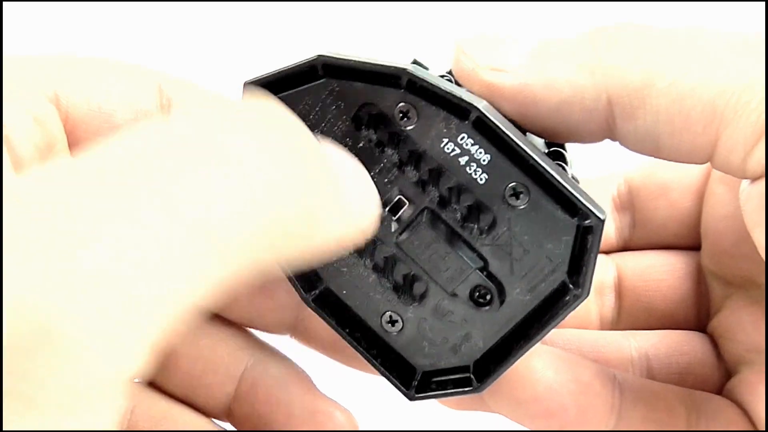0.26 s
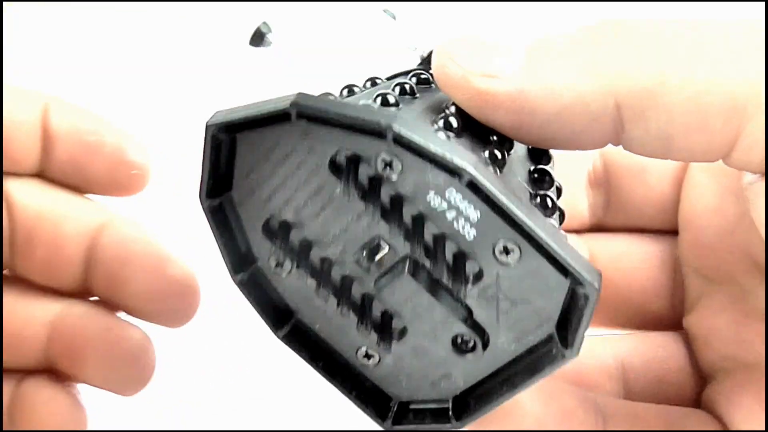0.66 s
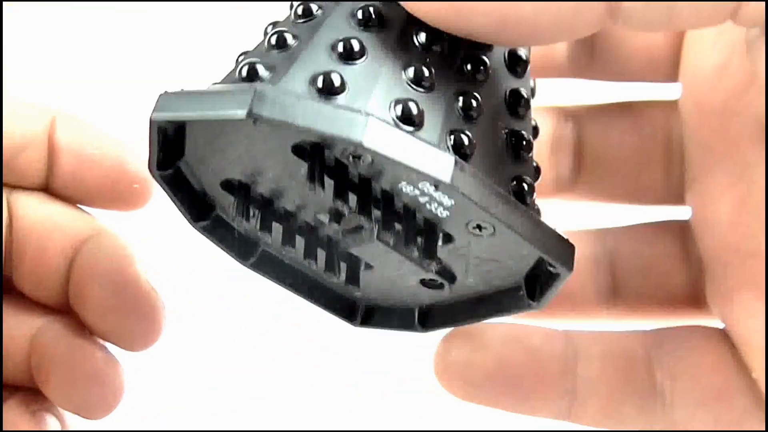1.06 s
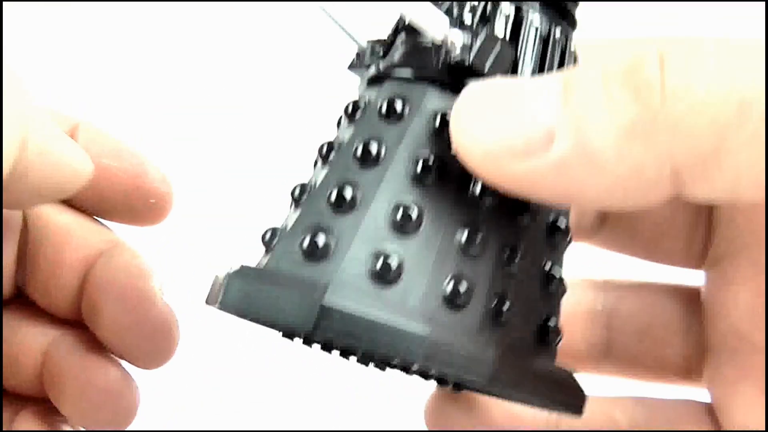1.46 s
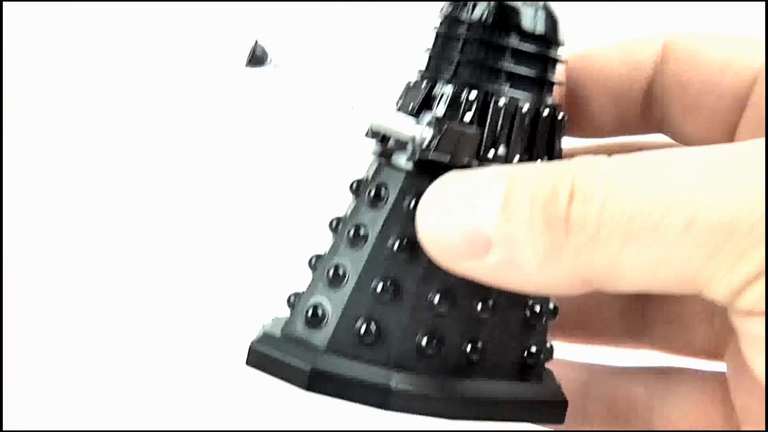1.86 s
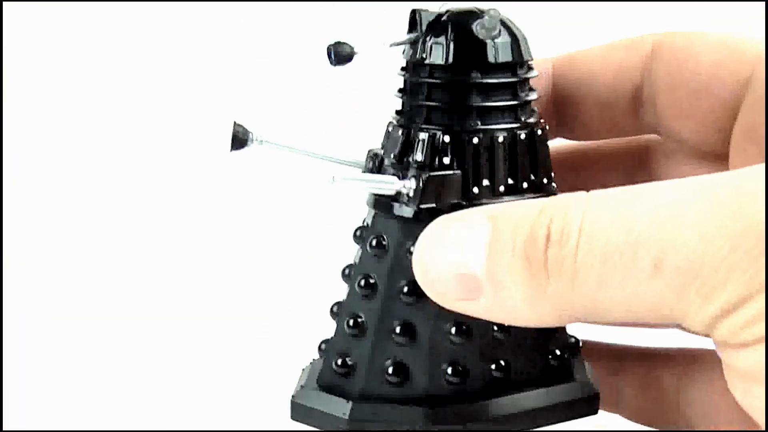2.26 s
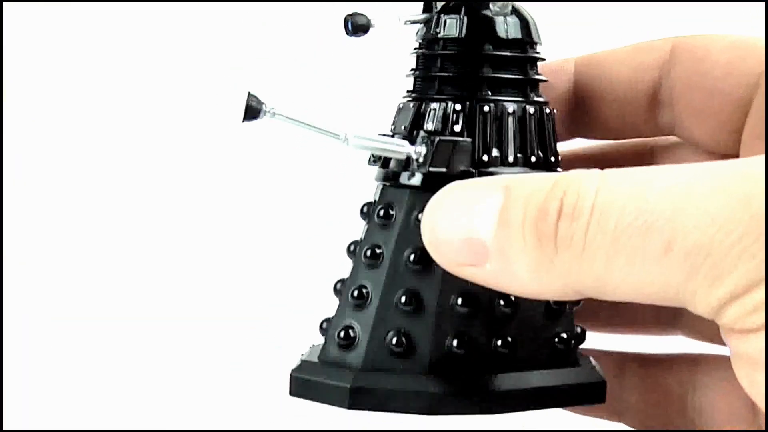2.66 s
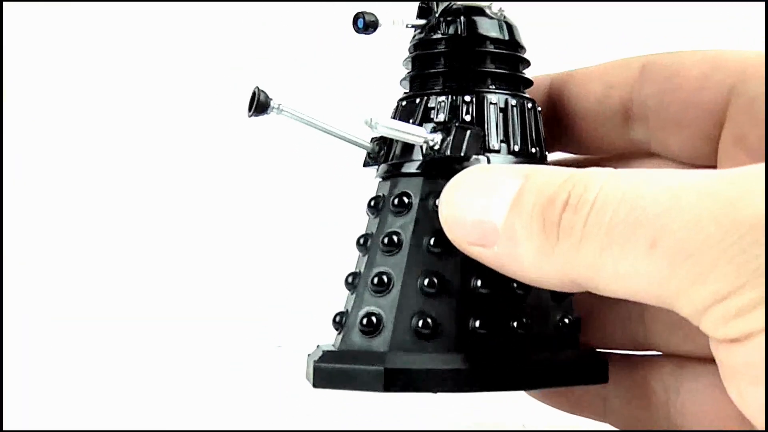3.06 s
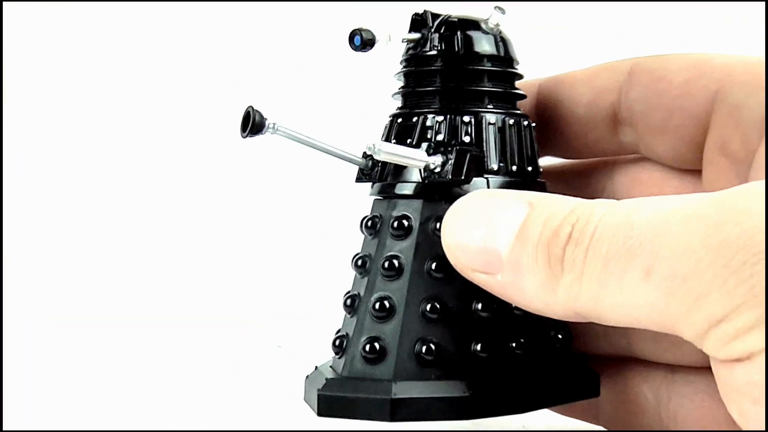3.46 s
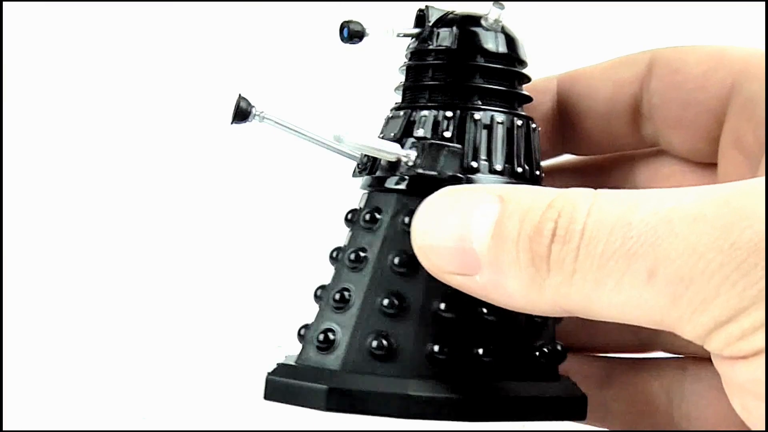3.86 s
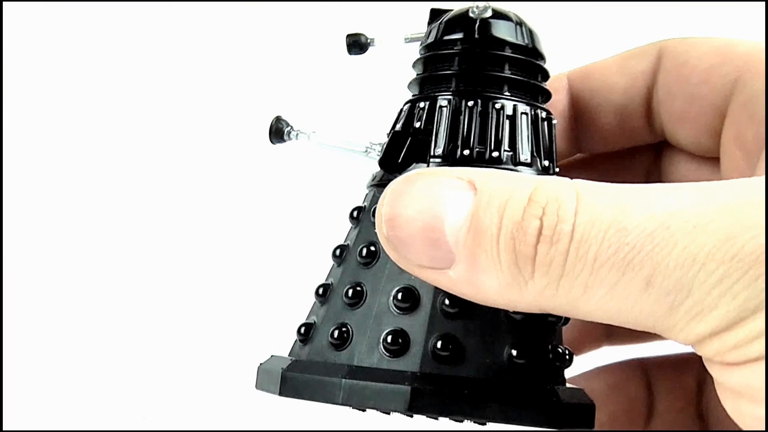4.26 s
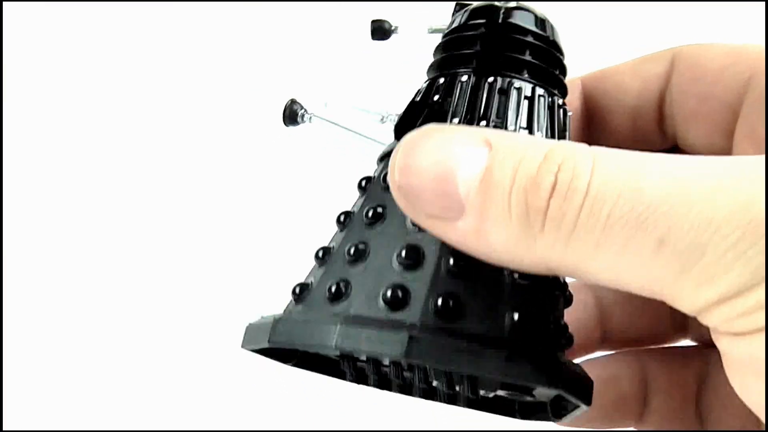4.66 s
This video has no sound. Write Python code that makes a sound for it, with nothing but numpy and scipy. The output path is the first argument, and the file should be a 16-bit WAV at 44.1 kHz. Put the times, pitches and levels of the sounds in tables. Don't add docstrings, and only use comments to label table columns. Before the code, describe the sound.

Close up in a quiet room, a small plastic toy snaps on and buzzes continuously, its shell rattling thinly as fingers shift and bump it.

```python
import sys
import numpy as np
from scipy import signal
from scipy.fft import rfft, irfft
from scipy.io import wavfile

SR = 44100
rng = np.random.default_rng(int(sys.argv[2]) if len(sys.argv) > 2 else 0)


def amplitude_ratio(level_db):
    exponent = np.asarray(level_db, float) / 20
    return 10 ** exponent


def log_audio(samples):
    frames = np.atleast_2d(samples).T
    limited = np.clip(frames, -1, 1)
    pcm = np.round(limited * 32767).astype(np.int16)
    wavfile.write(sys.argv[1], SR, pcm)


N = 212032

# frequency in Hz, density in dB per Hz.
ROOM_SPECTRUM = [(25, 8), (60, -23), (120, 4.5), (300, -5.5), (460, -1.5), (600, -7.5), (1000, -11.5),
                 (2000, -21.5), (2400, -14), (3000, -23), (8000, -26), (16000, -26.5)]
ROOM_DB = -56.5

# start in seconds, length in seconds, rub in dB, brightness in dB, weight in dB.
FINGER_SLIDES = [(0.194, 0.11, -64, -29, -9), (0.862, 0.11, -43, -10, -19), (0.946, 0.13, -46.5, 1.5, -24),
                 (1.053, .07, -43, -5, 0), (1.114, 0.17, -47.5, -6.5, -13), (1.475, 0.17, -46.5, -10, -26),
                 (1.675, 0.087, -57, 5, -8), (1.746, .12, -49.5, 3.5, -7), (1.943, 0.085, -53, -3, 1),
                 (2.206, 0.13, -56, 2.5, -8), (2.664, 0.073, -68, -14, 20), (2.846, 0.094, -72, 5, 18),
                 (2.97, 0.16, -64, -17, 6), (3.204, 0.095, -63, -9, -15), (3.97, 0.086, -77, 11, -2),
                 (4.56, 0.23, -58.5, -12, -7), (4.777, 0.069, -48.5, -4, -5)]
SLIDE_EDGE_SHARE = .6
HISS_DB, HISS_FOLLOWS = -51.5, 0.32
REST_RUMBLE_DB, REST_LOW_DB, REST_HIGH_DB, REST_HISS_DB = -73, -71, -63, -66

# start in seconds, peak in dB, contact in ms, signed direction (factor).
SOFT_BUMPS = [(0.834, -10.5, 1.53, 0.62), (1.068, -27.5, 4.2, -0.94), (1.478, -41, 2.7, 0.51),
              (1.979, -23.5, 2.9, -0.76), (2.039, -32, 2.9, -1), (2.658, -30, 2.8, -0.67),
              (2.691, -33.5, 2.9, -0.82), (2.715, -45, 1.4, -0.4), (2.751, -38, 2.5, -1.1),
              (2.774, -29, 3.4, -0.5), (2.814, -37, 3.1, -1.2), (2.857, -28.5, 2.9, -1.03),
              (2.913, -34, 3.2, -1.2), (2.978, -34, 2.3, -0.68), (3.048, -26.5, 3, -0.7),
              (3.2336, -17, 2.7, -0.52), (4.7920, -25, 0.49, 0.72), (4.7925, -17.5, 2.25, -0.83)]
# frequency in Hz, level in dB, T60 in seconds.
BUMP_MODES = [(1400, -40, .006), (1800, -31, .007), (2250, -42, .004)]
MOUNT_CUT_HZ, MOUNT_HZ, MOUNT_T60_S, MOUNT_DB = 200, 147, 0.023, -44

# time in seconds, level in dB.
SWITCH_TOUCHES = [(.1530, -48), (.1545, -44), (.1563, -27), (.1569, -21), (.1576, -20), (.1583, -24),
                  (.1598, -26), (.1620, -28), (.1630, -28), (.1652, -36), (.167, -38)]
# frequency in Hz, level in dB, T60 in seconds.
HOUSING_MODES = [(248, -35.5, 0.075), (464, -57, 0.042), (725, -16, 0.031), (1717, -19, 0.044),
                 (2280, -20, 0.021), (3340, -29, 0.015), (4140, -6, 0.0084), (5040, -7.5, 0.011),
                 (5680, -3, 0.02), (7150, -13, 0.021), (8270, -11.5, 0.014), (10650, -4, 0.0029),
                 (12200, -6, 0.0029), (1110, -23, 0.012)]
# time in seconds, frequency in Hz, T60 in seconds, peak in dB.
STOP_THUD = (.1560, 380, .008, -22.5)
SNAP_PEAK_DB = -13.5

# time in seconds, full speed in turns per second, hum in dB,
# hum left-right difference in dB.
MOTOR_COURSE = [(.17, 172, -60, -5), (.22, 172, -47.5, -5), (.29, 173, -47, -3), (.34, 173, -43, -2.2),
                (.5, 176.5, -40.2, -2.8), (.7, 178.4, -39.2, -2.9), (1.02, 176.4, -37.4, -3),
                (1.5, 175.9, -38.2, -4.7), (1.7, 174.6, -38.7, -4.4), (2.04, 174.8, -39.8, -3.3),
                (2.3, 175.5, -41.2, -4.3), (2.78, 176.2, -40.5, -4), (3.22, 173.2, -41, -4.5),
                (3.45, 172.7, -39.8, -4.1), (3.72, 172.2, -40.2, -4.2), (4.2, 175, -40.3, -2.2),
                (4.46, 173.4, -40.4, -1.5), (4.81, 173, -40.6, -1.7)]
# multiple of a turn, level in dB.
ROTOR_ORDERS = [(1, 0), (3, -26)]
# multiple of a turn, mode in Hz, width in Hz,
# level relative to the hum in dB, build-up in seconds.
COMMUTATOR_WHINE = (15, 2590, 140, -21, .4)
ON_S, RUN_UP_S, START_SHARE = .158, .045, .45

CONTACT_PHASES = [.04, .17, .43, .62, .80]
CONTACT_FORCES = [-3.5, -5.5, -3.5, -0.5, -6]
# time in seconds, looseness of grip in dB, open base facing the microphone
# in dB, stalks turned towards it in dB.
HAND_GRIP = [(.17, -1.5, 6.5, 25), (.3, 9, -15, -6), (.5, 1.5, -1, -1), (.71, 6.5, -4, 14), (.84, 1, 5, 20),
             (1.07, 0, 5, 17), (1.3, 3, 3.5, -4), (1.49, 5.5, 1.5, 2), (1.62, 3, 0, 2),
             (1.94, -0.5, 1, -13), (2.38, -7, 2, 7), (2.75, -6.5, 3, 12), (3.06, -1.5, -1.5, -1),
             (3.4, -6, 2, -13), (3.66, -2.5, 1.5, -24), (4.02, -3, 0, -6), (4.22, 1.5, -6.5, 9),
             (4.81, 2, -11.5, -16)]
# frequency in Hz, width in Hz, level in dB, left-right
# difference in dB, share of base (factor), share of stalks (factor).
SKIRT_MODES = [(660, 410, -10, -19, 0, 0.3), (1110, 520, -11, -24, 0.43, 0.043), (1270, 460, -5, 7.5, 1, 0),
               (1636, 620, -5, -6.5, 0.36, 0), (2060, 1000, -8, -12, 0.045, 0.23),
               (2956, 350, -2.5, 4, 0, 0), (3424, 660, -6, -4, 0.49, 0.043)]
WAIST_MODES = [(5420, 330, 0, -1, 0, 0), (5180, 300, -9, -1, 0, 0)]
BODY_MODES = [(4780, 1140, -12, -1.5, 1.32, 0), (6017, 500, -1, -3, 0.19, 0.024),
              (6263, 580, -3, 0.5, 0.025, 0), (6990, 910, -7.5, -1.5, 0.34, 0),
              (8130, 260, -16.5, 6.5, 1, 0.023), (8620, 490, -12, 1, 0.79, 0.14),
              (9570, 2200, -15.5, -13.5, 0.46, 0.02)]
STALK_MODES = [(13480, 450, -1, 3, 0, -.2), (13900, 500, 0, 3, 0, 0), (14350, 500, -6, 2.5, 0, .3),
               (9660, 1500, -18.5, -3, 0, 0), (11270, 450, -14, -12, 0.035, 0.37),
                (12200, 540, -20, 16, 0.016, 0.033), (14700, 2700, -20.5, 31, 0.035, 0)]
BODY_DB, SKIRT_DB, SKIRT_FOLLOWS = -47, -64.5, -0.18
WAIST_DB, STALK_DB = -58, -50
# start in seconds, length in seconds, gain in dB.
WAIST_LIFTS = [
    (.6, 0.17, 3),
    (1.05, 0.43, 13),
    (1.65, 0.5, 8.5),
    (2.98, 0.32, 5.5),
    (3.35, 0.66, 2),
    (4.02, 0.98, 13.5),
]
# start in seconds, length in seconds, gain in dB.
STALK_SWINGS = [(.2, 0.11, 3), (.37, .11, 10.5), (.58, 0.17, 4), (1.03, 0.043, 5), (1.27, 0.23, 3),
                (1.85, 0.44, 6), (2.42, .5, 2.5), (3.38, 0.16, 2), (3.85, 0.34, 3.5), (4.45, 0.52, 2.5)]
LIFT_S = 0.15

CUTOFF_HZ = 15680


def rms_one(x):
    return x / np.sqrt(np.mean(x ** 2) + 1e-20)


def in_time(rows):
    s, *columns = np.transpose(rows)
    return [np.interp(np.arange(N) / SR, s, c) for c in columns]


def pan(x, db):
    return x * amplitude_ratio(np.array([db / 2, -db / 2]).reshape(2, -1))


def high_pass(x, hz, order=2):
    return signal.sosfilt(signal.butter(order, hz, "high", fs=SR, output="sos"), x)


def band(x, low_hz, high_hz):
    return signal.sosfilt(signal.butter(2, [low_hz, high_hz], "band", fs=SR, output="sos"), x)


def drift(shape, steps):
    r = np.exp(-1 / steps)
    white = rng.standard_normal((*shape[:-1], shape[-1] + 500))
    return rms_one(signal.lfilter([1], [1, -2 * r, r * r], white)[..., 500:])


def ring(drive, hz, t60):
    r, w = amplitude_ratio(-60 / (t60 * SR)), 2 * np.pi * hz / SR
    return signal.lfilter([0, np.sin(w)], [1, -2 * r * np.cos(w), r * r], drive + 1e-18)


def ring_twice(drive, hz, t60):
    return ring(ring(drive, hz, t60), hz, t60)


def clicks_at(seconds, sizes):
    at = np.ravel(seconds) * SR
    taps = np.floor(at)[:, None] + np.arange(-7, 9)
    offset = taps - at[:, None]
    shape = np.sinc(offset) * np.cos(np.pi * offset / 16) ** 2
    index = np.clip(taps, 0, N - 1).astype(int).ravel()
    return np.bincount(index, (shape * np.ravel(sizes)[:, None]).ravel(), N)


def noise_pair(alike):
    mid, side = rng.standard_normal((2, N))
    alike = np.clip(alike, 0, 1)
    return np.sqrt(1 + alike) * mid + np.sqrt(1 - alike) * side * [[1], [-1]]


def spans(starts, lengths, edge_s):
    t = np.arange(N) / SR - np.reshape(starts, (-1, 1))
    ramp = np.minimum(t, np.reshape(lengths, (-1, 1)) - t) / edge_s + .5
    return np.sin(np.pi / 2 * np.clip(ramp, 0, 1)) ** 2


def freed(rows):
    s, length, gain_db = np.transpose(rows)
    return gain_db @ spans(s, length, LIFT_S)


def room():
    hz, level_db = np.transpose(ROOM_SPECTRUM)
    bins_hz = np.fft.rfftfreq(N, 1 / SR) + 1
    colour = amplitude_ratio(np.interp(np.log(bins_hz), np.log(hz), level_db))
    return amplitude_ratio(ROOM_DB) * rms_one(irfft(rfft(noise_pair(0.067)) * colour, N))


def fingers():
    s, length, rub_db, bright_db, weight_db = np.transpose(FINGER_SLIDES)
    slides = spans(s, length, SLIDE_EDGE_SHARE * length[:, None]) ** 2
    base_db = in_time(HAND_GRIP)[1]

    def level(db, rest_db):
        return np.sqrt(amplitude_ratio(db) ** 2 @ slides + amplitude_ratio(rest_db) ** 2)

    def bite(db):
        return db - 5.5 + np.minimum(db + 52.0, 0)

    lumps = amplitude_ratio(1.3 * drift((N,), 160) + 1.73 * drift((N,), 420))
    deep = band(band(noise_pair(0.93), 55, 200), 55, 200)
    rumble = level(rub_db + weight_db, REST_RUMBLE_DB) * rms_one(deep)
    low = level(rub_db, REST_LOW_DB) * rms_one(lumps * band(noise_pair(0.91), 152, 644))
    high_level = level(bite(rub_db + bright_db), bite(REST_HIGH_DB))
    high = high_level * rms_one(lumps * band(noise_pair(0.17), 800, 2100))
    hiss_db = HISS_DB + HISS_FOLLOWS * (rub_db + 47) + 0.29 * bright_db
    hiss_level = level(hiss_db, REST_HISS_DB + 0.27 * base_db)
    hiss = hiss_level * rms_one(band(noise_pair(0.89), 1850, 8700))
    touching = np.arange(N) > .2 * SR
    return pan((rumble + low + high + hiss) * touching, -0.33)


def bumps():
    pushes = np.zeros(N)
    for s, peak_db, contact_ms, direction in SOFT_BUMPS:
        push = np.hanning(round(contact_ms * SR / 1000) + 2)
        push = push ** .55
        at = round(s * SR)
        pushes[at:at + len(push)] += direction * amplitude_ratio(peak_db) * push
    pressure = high_pass(pushes, MOUNT_CUT_HZ, order=1)
    rebound = amplitude_ratio(MOUNT_DB) * ring(pressure, MOUNT_HZ, MOUNT_T60_S)
    knock = sum(amplitude_ratio(db) * ring(pushes, hz, t60) for hz, db, t60 in BUMP_MODES)
    return pan(1.3 * pressure + rebound + knock, -1.8)


def switch():
    s, level_db = np.transpose(SWITCH_TOUCHES)
    scrape_decay = amplitude_ratio(-60 / (.003 * SR))
    touches = signal.lfilter([1], [1, -scrape_decay], clicks_at(s, amplitude_ratio(level_db)))
    snap = 0
    for hz, mode_db, t60 in HOUSING_MODES:
        grain = .7 if hz < 1300 else rng.standard_normal(N)
        snap = snap + amplitude_ratio(mode_db) * ring(touches * grain, hz, t60)
    snap = high_pass(snap, 160)
    s, hz, t60, peak_db = STOP_THUD
    thud = ring_twice(clicks_at([s], [1]), hz, t60)
    snap = amplitude_ratio(SNAP_PEAK_DB) * snap / np.abs(snap).max()
    thud = amplitude_ratio(peak_db) * thud / np.abs(thud).max()
    return pan(snap + thud, -1.5)


def shell_part(modes, turns, base_db, stalks_db, rough, scrape_db):
    count, out = int(turns[-1]), 0
    contacts = len(CONTACT_PHASES)
    place = np.arange(count) + np.array(CONTACT_PHASES)[:, None]
    place = place + 0.004004 * drift((contacts, count), 58.5)
    when = np.interp(place, turns, np.arange(N) / SR)
    loose = rough * amplitude_ratio(base_db[(when * SR).astype(int)] + 5.0) + 0.31 * np.exp(-place / 30)
    for hz, width_hz, level_db, pan_db, base, stalks in modes:
        usual = amplitude_ratio(np.array(CONTACT_FORCES))[:, None] * rng.choice([-1, 1], (contacts, 1))
        force = usual + .5 * drift(place.shape, 27.7) + 0.34 * drift(place.shape, 2.9)
        force = force / np.sqrt(np.mean(force ** 2, axis=0))
        ticks = rms_one(clicks_at(when, force + loose * rng.standard_normal(place.shape)))
        drive = ticks + amplitude_ratio(scrape_db) * noise_pair(0.81)
        wander_db = np.repeat(1.5 * drift((N // 100 + 1,), 22.4), 100)[:N]
        t60 = np.log(1000) / np.pi / width_hz
        rung = rms_one(ring_twice(drive, hz, t60))
        gain_db = level_db + base * base_db + stalks * stalks_db + wander_db
        out = out + pan(rung * amplitude_ratio(gain_db), pan_db + wander_db)
    return out


def rotor_tones(speed, turns):
    tones = 0
    for k, db in ROTOR_ORDERS:
        unsteady_db = (k > 1) * 2.0 * drift((N,), 1200)
        tones = tones + amplitude_ratio(db + unsteady_db) * np.sin(2 * np.pi * k * turns)
    order, mode_hz, width_hz, whine_db, build_s = COMMUTATOR_WHINE
    build_up = np.clip(np.arange(N) / SR / build_s - .6, .05, 1)
    tuned = build_up / (1 + ((order * speed - mode_hz) / width_hz) ** 2)
    whine_level = amplitude_ratio(whine_db + 2.0 * drift((N,), 3100))
    return tones + whine_level * tuned * np.sin(2 * np.pi * round(order) * turns)


def motor():
    speed, hum_db, hum_pan_db = in_time(MOTOR_COURSE)
    loose_db, *held = in_time(HAND_GRIP)
    since = np.maximum(np.arange(N) / SR - ON_S, 0)
    on = np.clip(since / .02, 0, 1)
    speed = speed * (1 - (1 - START_SHARE) * np.exp(-since / RUN_UP_S))
    turns = np.cumsum(speed * on + 1e-6) / SR
    hum = pan(np.sqrt(2) * amplitude_ratio(hum_db) * rotor_tones(speed, turns), hum_pan_db)

    skirt = shell_part(SKIRT_MODES, turns, *held, rough=.15, scrape_db=-20)
    waist = shell_part(WAIST_MODES, turns, *held, rough=.12, scrape_db=-20)
    body = shell_part(BODY_MODES, turns, *held, rough=.14, scrape_db=-18)
    stalks = shell_part(STALK_MODES, turns, *held, rough=0.031, scrape_db=-17.0)
    shell = amplitude_ratio(SKIRT_DB + SKIRT_FOLLOWS * loose_db) * skirt
    shell += amplitude_ratio(WAIST_DB + freed(WAIST_LIFTS)) * waist
    shell += amplitude_ratio(BODY_DB + loose_db) * body
    shell += amplitude_ratio(STALK_DB + freed(STALK_SWINGS)) * stalks
    return on * (hum + np.clip(since / 0.028, 0, 1) * shell)


def scene():
    return room() + fingers() + bumps() + switch() + motor()


def band_limit(x):
    return signal.sosfilt(signal.butter(12, 16680, fs=SR, output="sos"), x)


def record(dry):
    x = high_pass(dry, 60)
    x = signal.sosfilt(signal.ellip(14, .1, 80, CUTOFF_HZ, fs=SR, output="sos"), x)
    return band_limit(x)


dry = scene()
out = record(dry)
log_audio(out)
```